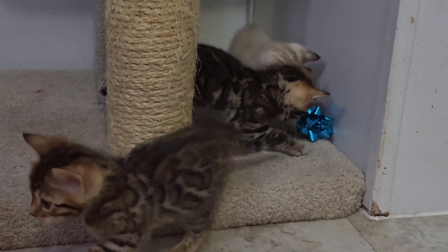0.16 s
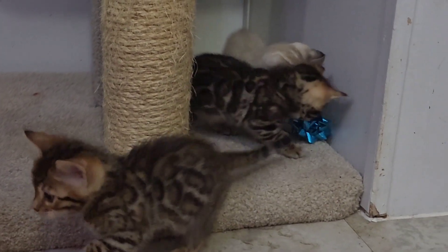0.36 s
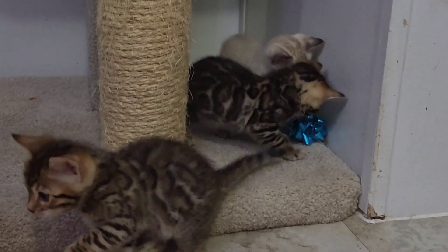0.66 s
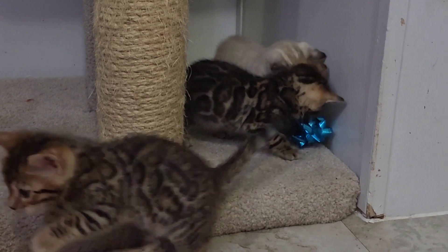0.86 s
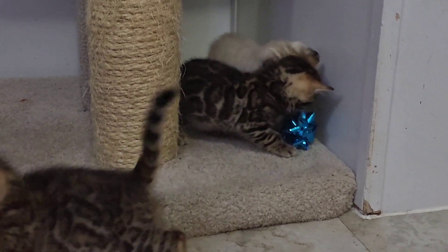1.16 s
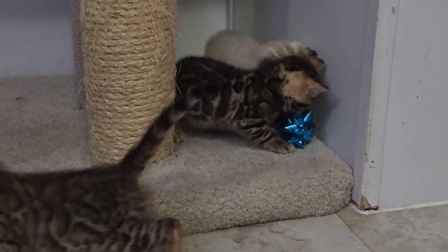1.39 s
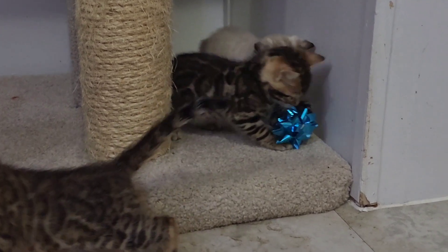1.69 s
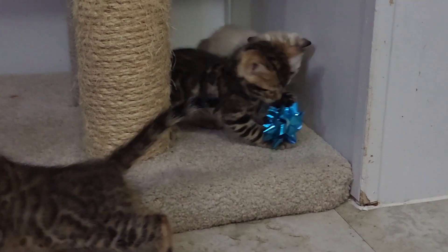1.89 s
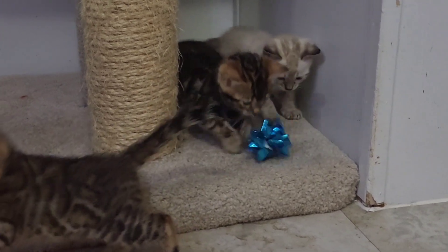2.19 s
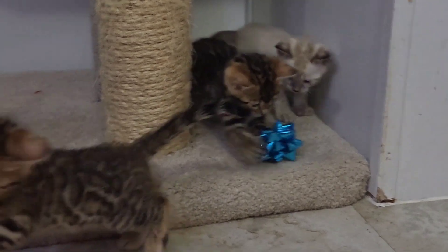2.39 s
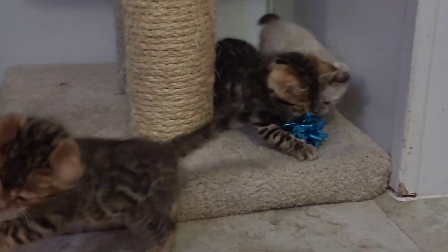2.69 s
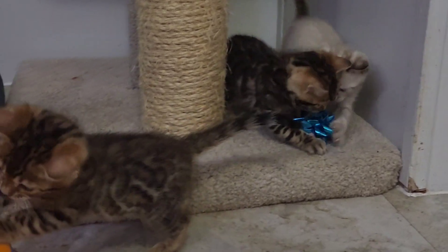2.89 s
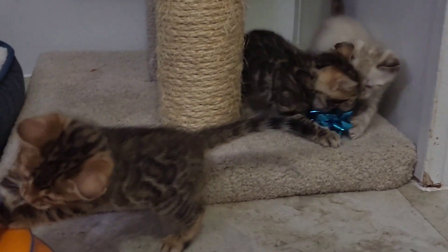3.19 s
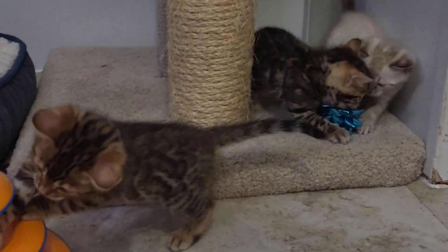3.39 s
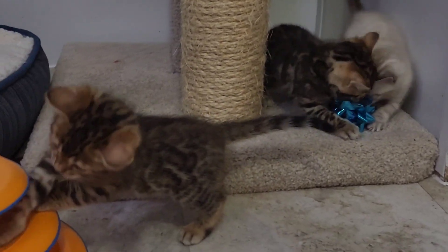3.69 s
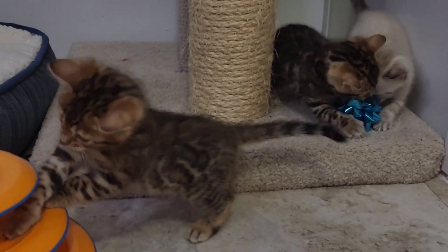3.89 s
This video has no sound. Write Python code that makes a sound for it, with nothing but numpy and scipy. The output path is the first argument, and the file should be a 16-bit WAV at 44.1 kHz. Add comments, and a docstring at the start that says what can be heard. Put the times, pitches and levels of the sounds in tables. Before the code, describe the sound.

A foil bow, pawed and bitten by kittens, rustles faintly from 0.3 s, then snaps around 1.2 and brightest at 1.4 s. A plastic track toy knocks hollowly at 1.2 and loudest at 1.6 s, with low thuds; its ball rumbles on, fading by 2.8 s. Foil crackles again at 2.25-2.35 and 2.9 s, with softer knocks, then faint ticks to 3.6 s. Low wavering hum, briefly swelling near 2.5 s; small reflective room.

```python
"""A small hard-walled room with a wavering low hum, where kittens play.
One paws and bites a foil bow: filtered noise bursts snap, swells of random clicks rustle.
Another bats a plastic track toy: noise bursts ring its shell, loudest near 1.2 and 1.6 s,
and its ball rolls on as filtered bumps that fade. Damped low sines make low thuds and, at
2.476 s, a brief swell of the hum. Decaying noise makes the reflections of foil and toy."""
import sys
import numpy as np
from scipy import signal
from scipy.fft import rfft, irfft
from scipy.io import wavfile

SR = 44100
rng = np.random.default_rng(int(sys.argv[2]) if len(sys.argv) > 2 else 0)


def transcribe(u):
    """Save the signal u as a 16-bit wav file named by the first command-line argument.

    u: samples, shape (n,) or (channels, n), limited to [-1, 1]; the rate is SR.
    q: integer samples, one column per channel.
    """
    v = np.clip(np.atleast_2d(u).T, -1, 1)
    q = np.round(v * 32767).astype(np.int16)
    wavfile.write(sys.argv[1], SR, q)


N = 176400
T = np.arange(N) / SR
HZ = np.fft.rfftfreq(4096, 1 / SR) + 1  # filter design axis, offset to avoid log 0
FULL_HZ = np.fft.rfftfreq(N, 1 / SR)


def amp(db):
    """Decibels to gain."""
    return 10 ** (np.asarray(db) / 20)


def evened(x):
    """Scales to rms 1."""
    return x / np.sqrt(np.mean(x ** 2) + 1e-20)


def read(points, hz):
    """Interpolates (frequency, value) points on a log-frequency axis."""
    f, value = np.transpose(points)
    return np.interp(np.log(hz + 1), np.log(f), value)


def bump(octaves, width):
    """Gaussian peak of height 1, read some octaves from its centre."""
    return np.exp(-.5 * (octaves / width) ** 2)


def add(mix, start_s, sound):
    """Mixes a sound in at a time, cut off at the end of the mix."""
    start = max(round(start_s * SR), 0)
    part = mix[..., start:][..., :sound.shape[-1]]
    part += sound[..., :part.shape[-1]]


def colour(x, db):
    """Minimum-phase filter of unit energy, with its spectral shape in dB along HZ."""
    log_gain = np.log(amp(np.r_[db, db[-2:0:-1]]))
    spectrum = np.exp(np.conj(signal.hilbert(log_gain)))
    taps = np.fft.ifft(spectrum).real[:len(db)]
    return signal.fftconvolve(x, taps / np.linalg.norm(taps))


def wander(rate_hz):
    """Slow random fluctuation of rms 1: noise under a Gaussian low-pass."""
    lowpass = np.exp(-(FULL_HZ / rate_hz) ** 2)
    return evened(irfft(rfft(rng.standard_normal(N)) * lowpass, N))


def grains(per_s, spread_db):
    """Random clicks of uneven size and random sign, rms 1."""
    size = amp(spread_db * np.minimum(rng.exponential(1, N), 4))
    sign = rng.choice([-1, 1], N)
    return evened(size * sign * (rng.random(N) < per_s / SR))


def burst(decay_s):
    """Flurry of tiny contacts: noise under an exponential decay."""
    t = T[:SR // 8]
    fade = np.exp(-t / decay_s)
    fade_rms = np.sqrt(np.mean(fade ** 2))
    return evened(rng.standard_normal(len(t)) * fade) * fade_rms


def panned(x, db):
    """Mono to stereo with a left-minus-right level difference."""
    return amp([[db / 2], [-db / 2]]) * x


# likeness of diffuse sound at two ports: (frequency [Hz], correlation [-])
PORT_LIKENESS = [(30, 0.72), (120, 0.89), (300, 0.27), (600, 0.6), (1200, 0), (8000, 0.06)]


def diffuse(n):
    """White noise from all sides: two channels with frequency-dependent correlation."""
    a, b = rfft(rng.standard_normal((2, n)))
    same = np.clip(read(PORT_LIKENESS, np.fft.rfftfreq(n, 1 / SR)), -1, 1)
    return irfft(np.array([a, same * a + np.sqrt(1 - same ** 2) * b]), n)


def direct(x, lead_s):
    """Straight path, which reaches the right port a little later than the left."""
    delay = np.exp(-2j * np.pi * FULL_HZ * lead_s)
    return np.array([x[0], irfft(rfft(x[1]) * delay, N)])


EARLY_S, EARLY_DB = 0.012, -2.5  # decay and level of scatter from near walls and floor
ROOM_GAP_S = 0.0021  # reflections fade in over 0.5 to 1.5 of this gap
# reverberation time: (frequency [Hz], t60 [s])
ROOM_DECAY = [(100, 0.358), (500, 0.34), (1500, 0.65), (4000, 0.42), (8000, 0.26), (15000, 0.27)]


def room(x, wet_db):
    """Convolves with near reflections and a tail that decays at its own rate per frequency."""
    hz, t, z = signal.stft(diffuse(SR // 2), SR, nperseg=256)
    decay = amp(-60 * t / read(ROOM_DECAY, hz)[:, None])
    tail = signal.istft(z * decay, SR, nperseg=256)[1]
    t = T[:tail.shape[1]]
    early = diffuse(len(t)) * np.exp(-t / EARLY_S)
    onset = np.clip(t / ROOM_GAP_S - .5, 0, 1)
    echoes = amp(wet_db) * evened(tail * onset) + amp(EARLY_DB) * evened(early * onset)
    return signal.fftconvolve(x, echoes / np.sqrt(len(t)), axes=1)[:, :N]


AIR_DB = -53
HUM_WAVER_DB, HUM_DRIFT_HZ = 3, 0.62  # rms
# spectral shape of rumble and hiss: (frequency [Hz], level [dB])
AIR_SPECTRUM = [(15, -35), (35, -1.5), (55, -0.5), (95, 4.5), (115, 5), (135, -5.5), (190, -15.5),
                (260, -16.5), (350, -27), (600, -28.5), (1200, -35.5), (2500, -41.5), (4500, -41.5),
                (6000, -50.5), (8400, -41.5), (9800, -62.5), (16000, -54)]
# motor tones: (frequency [Hz], level [dB])
HUM_TONES = [(57.5, -65), (109, -59.5), (119.5, -61), (165, -74.5), (240, -78.5)]


def room_hum():
    """Motor tones wavering in level and pitch, in low rumble with faint hiss above."""
    air = irfft(rfft(diffuse(N)) * amp(read(AIR_SPECTRUM, FULL_HZ)), N)
    hum = amp(AIR_DB) * evened(air)
    for hz, db in HUM_TONES:
        level = amp(db + HUM_WAVER_DB * wander(rate_hz=1.34))
        pitch_hz = hz + HUM_DRIFT_HZ * wander(rate_hz=3.18)
        hum += level * np.sqrt(2) * np.sin(2 * np.pi * np.cumsum(pitch_hz) / SR)
    return hum


LOW_RISE_S, LOW_DECAY_S = 0.0056, 0.037
# low thuds, and at 2.476 s a brief swell of the hum near 110 Hz: (time [s], level [dB], pitch [Hz])
LOW_PULSES = [(1.172, -36, 82.3), (1.606, -41, 80), (2.339, -54.5, 250), (2.408, -52, 219.4),
              (2.476, -38, 109.5), (2.906, -63.5, 260), (3.113, -51.5, 170.6)]


def low_thuds_and_swell():
    """Each thud or hum swell gives a few damped low cycles."""
    out, t = np.zeros(N), T[:SR // 2]
    envelope = np.minimum(t / LOW_RISE_S, 1) * np.exp(-t / LOW_DECAY_S)
    for start_s, db, hz in LOW_PULSES:
        add(out, start_s, amp(db) * np.sin(2 * np.pi * hz * t) * envelope)
    return out


BUMPS_PER_S, BUMP_SPREAD_DB = 450, 2.5
ROLL_WAVER_DB, ROLL_PATCH_DB = 1, 3  # rms, overall and per band
ROLL_RING_DB, ROLL_RING_OCTAVES = 5.5, 0.19
HALF_OCTAVES = np.arange(7, 14, .5)  # band centres [log2 Hz]
# rolling ball: (time [s], level [dB], track resonance [Hz])
ROLL_PATH = [(1.62, -65, 1480), (1.72, -62, 990), (1.87, -63, 910), (1.97, -60, 1370), (2.021, -57.5, 1760),
             (2.121, -64, 1140), (2.22, -63, 1570), (2.31, -58, 810), (2.48, -69, 970), (2.58, -59.5, 1380),
             (2.75, -73, 670), (2.839, -80, 600), (2.97, -72, 740), (3.5, -84, 596), (4, -77.5, 603)]
# spectral shape of the track: (frequency [Hz], level [dB])
TRACK_SPECTRUM = [(120, -5.5), (220, 4), (360, -3.5), (450, 2), (600, 5), (800, 0.5), (1800, -2),
                  (2200, -9), (2800, -30.5), (6000, -27), (12000, -39)]


def rolling_ball():
    """Small bumps excite the track, whose resonance moves as the ball rolls."""
    s, db, hz = np.transpose(ROLL_PATH)
    clicks = grains(BUMPS_PER_S, BUMP_SPREAD_DB)
    bumps = rfft(colour(clicks, read(TRACK_SPECTRUM, HZ))[:N])
    octave, centre = np.log2(FULL_HZ + 1), np.interp(T, s, np.log2(hz))
    ball = np.zeros(N)
    for k in HALF_OCTAVES:
        band = irfft(bumps * np.maximum(1 - 2 * abs(octave - k), 0), N)
        ring_db = ROLL_RING_DB * bump(centre - k, ROLL_RING_OCTAVES)
        ball += band * amp(ROLL_PATCH_DB * wander(rate_hz=8.6) + ring_db)
    level_db = np.interp(T, s, db) + ROLL_WAVER_DB * wander(rate_hz=20.5)
    return (T > s[0]) * evened(ball) * amp(level_db)


TILT_FROM_HZ = 760
HOLLOW_DB, HOLLOW_OCTAVES = 8.5, 0.21  # hollow ring of the struck spot
MODES_DB = -49  # gain of the shell modes
TOY_WET_DB, TOY_LEAD_S, TOY_PAN_DB = -3, 0.00037, .5
# knocks and scuffs: (time [s], level [dB], contact decay [s], tilt [dB/octave], hollow ring [Hz])
TOY_KNOCKS = [(0.819, -64, 0.04, -4.5, 570), (1.157, -44, 0.0082, -2.5, 550), (1.172, -38, 0.0082, -1, 540),
              (1.191, -36.5, 0.0041, -6.5, 528), (1.357, -50.5, 0.011, -2.5, 510),
              (1.424, -47, 0.0094, 2, 560), (1.575, -46, 0.04, 2, 695), (1.6004, -22.5, 0.0025, -1, 510),
              (1.614, -35, 0.011, -6.5, 474), (2.006, -63, 0.017, -4, 560), (2.2, -53.5, 0.0068, -9.5, 600),
              (2.322, -50, 0.0098, -10.5, 640), (2.681, -52.5, 0.011, -15.5, 560),
              (2.723, -53.5, 0.0063, -6.5, 646), (2.874, -47.5, 0.0033, -17, 653),
              (3.101, -57.5, 0.0038, -10, 765), (3.314, -55, 0.0039, -13, 455),
              (3.59, -54.5, 0.0023, -7.5, 660)]
# spectral shape of the plastic shell: (frequency [Hz], level [dB])
SHELL_SPECTRUM = [(100, -22.5), (240, -4.5), (330, -9.5), (460, -1.5), (760, -2.5), (1050, -4.5), (1400, 2),
                  (2000, -0.5), (2700, -4), (5500, -8.5), (10000, -16), (13000, -7), (16000, -21)]
# ringing modes of the shell: (frequency [Hz], relative level [dB], t60 [s])
SHELL_RINGS = [(253, 3, 0.12), (1595, -16, .14), (1680, -9, 0.13), (1918, -3, 0.11), (2153, 0.5, 0.065)]


def track_toy():
    """Knocks ring a plastic shell, each with its own hollow note; the ball rolls in it."""
    drive, t = np.zeros(N), T[:SR // 2]
    for start_s, db, contact_s, tilt_db, hz in TOY_KNOCKS:
        tilt = tilt_db * np.log2(np.maximum(HZ, TILT_FROM_HZ))
        hollow = HOLLOW_DB * bump(np.log2(HZ / hz), HOLLOW_OCTAVES)
        shape = read(SHELL_SPECTRUM, HZ) + tilt + hollow
        add(drive, start_s, amp(db) * colour(burst(contact_s), shape))
    ring = sum(amp(db - 60 * t / t60) * np.cos(2 * np.pi * hz * t) for hz, db, t60 in SHELL_RINGS)
    ringing = amp(MODES_DB) * signal.fftconvolve(drive, ring)[:N]
    shell = panned(drive + ringing + rolling_ball(), TOY_PAN_DB)
    return direct(shell, TOY_LEAD_S) + room(shell, TOY_WET_DB)


RING_DB, RING_OCTAVES, TREBLE_HZ = 7, 0.79, 9430
LOOP_OCTAVES = 0.073  # width of the narrow modes
# spectral shape of foil: (frequency [Hz], level [dB])
FOIL_SPECTRUM = [(300, -8), (1050, -14.5), (1700, -9), (4000, -4), (8500, 1.5), (10000, -6.5),
                 (12000, -0.5), (16000, -5)]
# narrow modes of a foil loop: (multiple of ring pitch [-], level [dB])
FOIL_LOOP_MODES = [(.25, 7.5), (.36, 10), (.475, 7.5), (.82, -0.5), (1, 6)]


def facet(hz, treble_db):
    """Spectrum of one foil loop: a broad ring, its narrow modes and a treble shelf."""
    shelf = treble_db / (1 + (TREBLE_HZ / HZ) ** 12)
    ring = RING_DB * bump(np.log2(HZ / hz), RING_OCTAVES)
    modes = sum(db * bump(np.log2(HZ / (hz * ratio)), LOOP_OCTAVES) for ratio, db in FOIL_LOOP_MODES)
    return read(FOIL_SPECTRUM, HZ) + ring + modes + shelf


SNAP_DECAY_S = 0.00092
RUSTLE_PEAK = 0.5  # fraction of the rustle's length
CREASE_OCTAVES = 0.33  # largest pitch shift of a loop, up or down
# foil snaps: (time [s], level [dB], ring pitch [Hz], top treble [dB], left-right [dB])
FOIL_SNAPS = [(1.0123, -54.5, 7600, 8, 16), (1.1559, -38, 3370, -10, 13.5), (1.1892, -28.5, 5700, 4, -2.5),
              (1.355, -44, 3300, -36, 2), (1.405, -23, 6020, -1, 9.5), (1.4075, -22, 6700, 8.5, -8),
              (1.416, -30, 12400, -14, -7), (1.7, -40.5, 5870, -6, -2), (1.741, -46.5, 7130, -5, 3),
              (2.2433, -33.5, 6860, 5, 2), (2.3297, -28, 4560, -1.5, 3.5), (2.349, -38, 4080, -31, -12),
              (2.4218, -50, 7200, -4, -27), (2.645, -53.5, 10000, -4, 0), (2.7118, -56, 8400, 3, -1),
              (2.9132, -35.5, 5820, -13, 1), (3.5929, -51.5, 4580, -2, 5)]
# rustles of foil and paws: (time [s], length [s], level [dB], centre [Hz], top treble [dB])
FOIL_RUSTLES = [(0.257, 0.11, -66, 4260, -19), (0.7, 0.029, -66, 8250, -7), (0.81, 0.052, -55, 6830, -4),
                (0.87, 0.057, -57.5, 8150, -9), (0.971, 0.063, -55.5, 8000, -9),
                (1.138, 0.087, -51.5, 4050, -6), (1.212, 0.15, -65.5, 6860, 2),
                (1.552, 0.075, -47.5, 5770, 3), (1.589, 0.034, -41, 3580, -42),
                (1.732, 0.023, -54.5, 7900, -11), (2.126, 0.15, -67, 6800, -3), (2.248, 0.16, -60, 6700, 0),
                (2.33, 0.065, -55.5, 4240, -27), (2.407, 0.039, -58, 7000, 3),
                (2.563, 0.097, -65.5, 4620, -5), (2.962, 0.12, -69.5, 5940, -6.5),
                (3.197, 0.33, -76.5, 7800, -11.5), (3.578, 0.046, -66, 4580, -3)]


def crinkles(loops):
    """Foil loops buckle in snaps, and rustle in swells of creases, each loop at its own pitch."""
    out = np.zeros((2, N))
    for start_s, db, hz, treble_db, pan_db in FOIL_SNAPS:
        snap = amp(db) * colour(burst(SNAP_DECAY_S), facet(hz, treble_db))
        add(out, start_s, panned(snap, pan_db))
    for start_s, length_s, db, hz, treble_db in FOIL_RUSTLES:
        creases = loops[:, int(start_s * SR):][:, :int(length_s * SR)]
        parts = evened(creases) / np.sqrt(len(loops))
        swell = np.interp(T[:parts.shape[1]] / length_s, [0, RUSTLE_PEAK, 1], [0, 1, 0]) ** 0.62
        shifts = CREASE_OCTAVES * (2 * rng.random(len(loops)) - 1)
        for part, shift in zip(parts, shifts):
            rustle = colour(part * swell, facet(hz * 2 ** shift, treble_db))
            add(out, start_s, amp(db) * rustle)
    return out


CREASES_PER_S, CREASE_SPREAD_DB = 100, 2.5  # per loop
CREASE_CLUMP_DB, CLUMP_HZ = 2.5, 90  # shared level fluctuation, rms and rate
FOIL_WET_DB, FOIL_LEAD_S = -2.5, .00006


def foil_bow(directions=3, loop_count=4):
    """Facets colour crinkles differently per direction; all fill the room, one comes straight."""
    clicks = np.array([grains(CREASES_PER_S, CREASE_SPREAD_DB) for _ in range(loop_count)])
    loops = clicks * amp(CREASE_CLUMP_DB * wander(CLUMP_HZ))
    sides = [crinkles(loops) for _ in range(directions)]
    reflected = sum(room(side, FOIL_WET_DB) for side in sides) / np.sqrt(directions)
    return direct(sides[0], FOIL_LEAD_S) + reflected


def scene():
    """Sum of hum, low thuds and swell, toy and bow."""
    return room_hum() + low_thuds_and_swell() + track_toy() + foil_bow()


def record(dry):
    """Band limit: a linear-phase low-pass."""
    lowpass = signal.firwin(511, 15950, window=("kaiser", 9), fs=SR)  # edge in Hz
    return signal.oaconvolve(dry, lowpass[None], "same")


dry = scene()
out = record(dry)
transcribe(out)
```